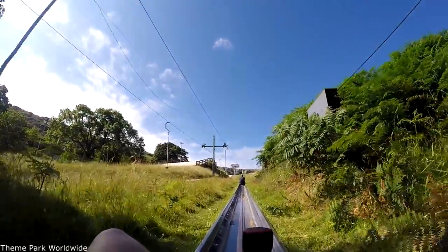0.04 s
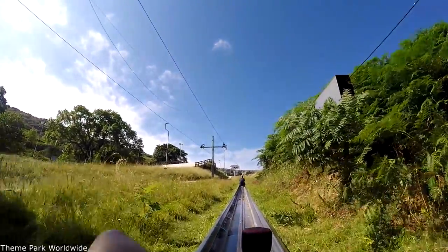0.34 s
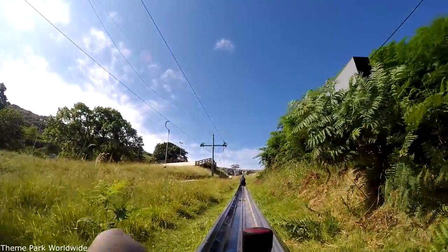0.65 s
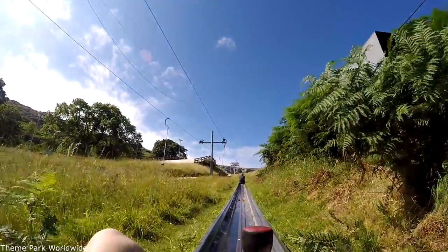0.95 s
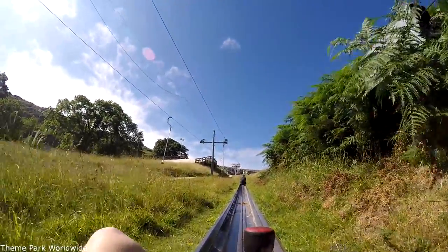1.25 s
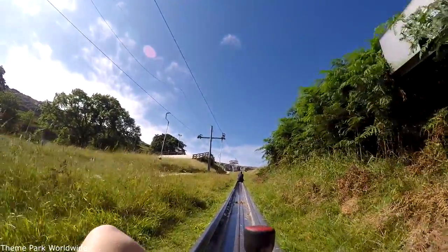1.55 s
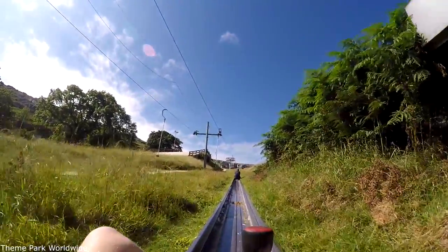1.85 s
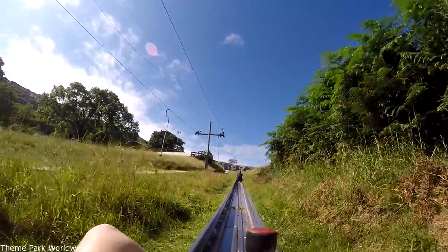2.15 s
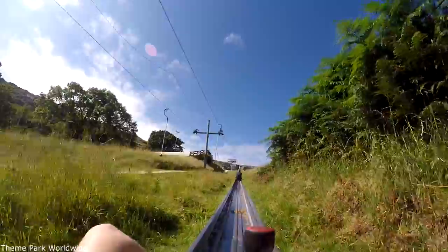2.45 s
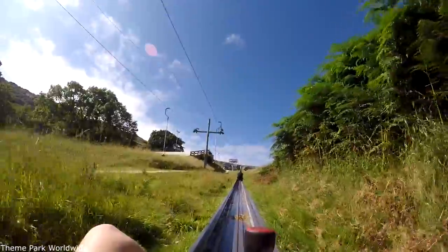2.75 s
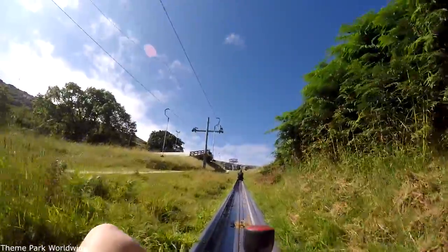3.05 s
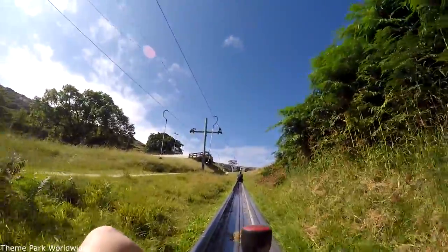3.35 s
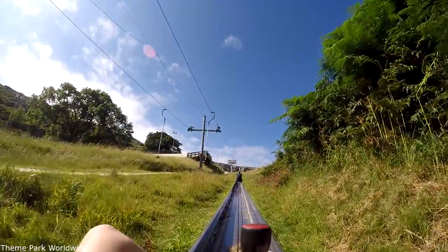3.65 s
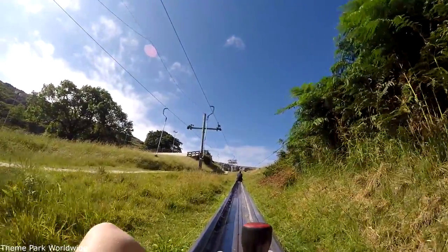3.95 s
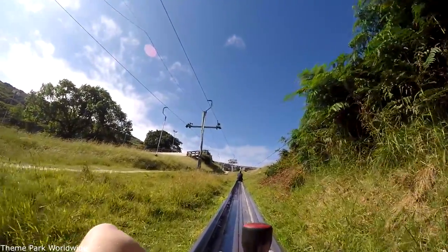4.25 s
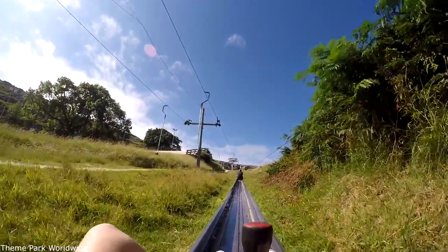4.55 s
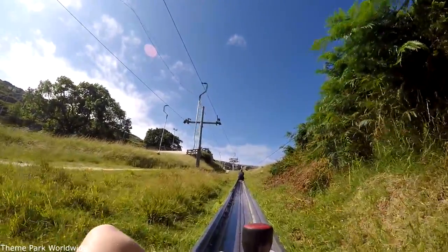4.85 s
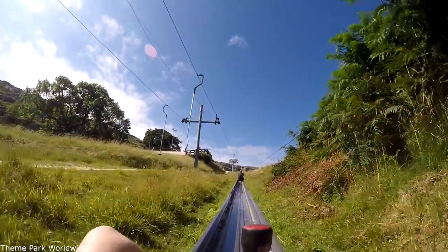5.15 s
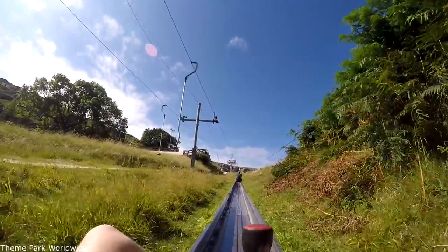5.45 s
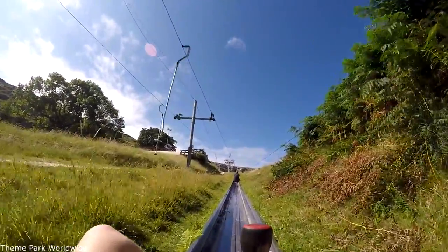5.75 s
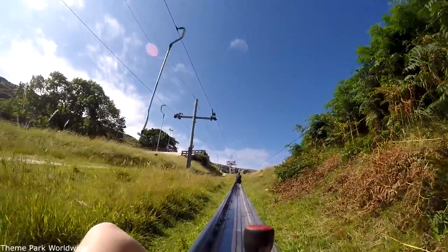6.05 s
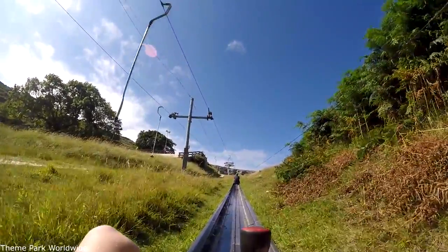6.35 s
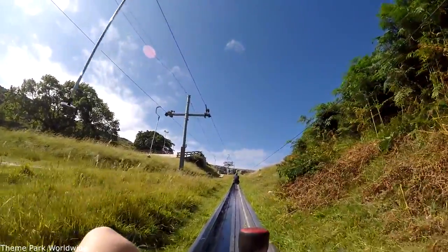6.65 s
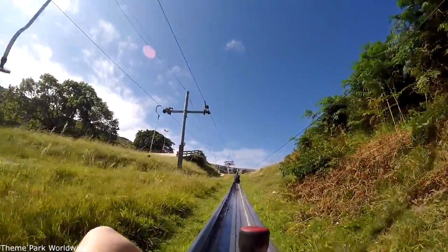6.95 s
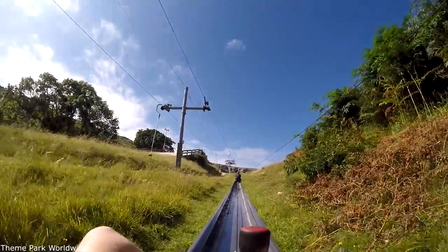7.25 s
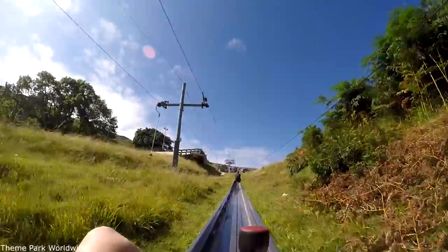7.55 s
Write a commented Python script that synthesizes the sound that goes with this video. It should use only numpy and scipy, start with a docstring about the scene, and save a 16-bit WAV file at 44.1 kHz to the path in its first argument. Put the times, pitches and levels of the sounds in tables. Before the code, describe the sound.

A toboggan sled is towed up a steel track on an open hillside, heard from the seat. Its wheels drum in a continuous low rumble, a little lighter at first, with a brief faint scrape on the rail. The rumble then grows fuller, with irregular hollow thumps from the shell, chattering loose fittings and occasional hard metal knocks. Light wind puffs against the microphone.

```python
"""Wheels drum on a steel track and thump the hollow shell of a summer toboggan being towed uphill.
The microphone rides at the seat, right above them. Close by, loose fittings chatter and now and then
knock hard. From below come the boom of the track and short scrapes and faint squeals where the sled
rubs the rail. Out on the open slope a little wind buffets the microphone, over a faint hiss."""
import sys
import numpy as np
from scipy import signal
from scipy.fft import rfft, irfft
from scipy.io import wavfile
from scipy.ndimage import uniform_filter1d

SR = 44100
rng = np.random.default_rng(int(sys.argv[2]) if len(sys.argv) > 2 else 0)


def store_wav(level_fs):
    """Save 16-bit WAV to argv[1]."""
    pcm = np.round(np.clip(np.atleast_2d(level_fs), -1, 1) * 32767)
    wavfile.write(sys.argv[1], SR, pcm.T.astype(np.int16))


N = 340011

# puffs of wind on the microphone: t/s at the peak, level/dB over the breeze
WIND_PUFFS = [(.02, 8.9), (1.96, 11), (2.53, 6.6), (3.87, 14.5), (4.49, 4.7), (5.78, 6)]
# squeals of the rail: t/s, length/s, first f/Hz, last f/Hz, level/dB
RAIL_SQUEALS = [(.257, 0.033, 2650, 2615, -51), (0.683, 0.03, 2170, 2400, -50),
                (5.49, .03, 4790, 4740, -53), (5.515, .06, 4600, 4500, -59)]
# light touches on the rail: t/s, length/s, f/Hz, level/dB
RAIL_BRUSHES = [(0.259, 0.009, 5750, -47), (1.302, 0.22, 4800, -59), (1.54, 0.4, 5060, -61.5),
                (5.397, 0.096, 4640, -54.5), (6.467, 0.1, 4900, -56.5)]
# course of the long scrape: t/s, level/dB
SCRAPE_CURVE = [(.165, -58.5), (.35, -49.5), (.39, -58), (.44, -47), (.53, -46.5), (.65, -54), (.695, -42),
                (.78, -53), (.84, -65)]
# grit cracking under the scrape: t/s, force/dB
GRIT_CRACKS = [(.172, -42.5), (.282, -44), (.437, -40), (.490, -38), (.524, -41)]
# clicks of small loose parts: t/s, force/dB
PART_CLICKS = [(1.673, -45), (1.849, -47), (2.252, -47.5), (2.558, -46), (4.359, -45), (4.591, -50),
               (5.109, -48), (5.411, -43), (5.727, -49), (6.416, -48)]
# drops of a wheel onto the hollow track: t/s, force/dB
WHEEL_DROPS = [(.007, -21.5), (0.339, -25), (.578, -32), (.866, -37), (0.962, -26.5), (.995, -22),
               (1.077, -25), (1.134, -26.5), (1.338, -20), (1.945, -20), (2.366, -28), (2.399, -27),
               (2.721, -27), (2.862, -28), (3.04, -29), (3.416, -30), (3.85, -29), (4.245, -29),
               (4.283, -28), (4.474, -31), (4.502, -23), (5.141, -28), (5.263, -30), (5.629, -23),
               (6.187, -23), (6.496, -30), (7.226, -28), (7.294, -28)]
# heavy bumps that set one part of the shell booming: t/s, f/Hz, level/dB
SHELL_THUMPS = [(.002, 372, -19.5), (1.216, 348, -16.5), (1.311, 365, -16.5), (1.411, 408, -17.5),
                (1.957, 232, -14.5), (2.400, 313, -23), (3.013, 360, -20.5), (3.175, 221, -19),
                (3.41, 349, -25), (3.622, 384, -16.5), (3.851, 300, -15), (4.076, 190, -30),
                (4.226, 364, -16), (4.277, 365, -19), (4.413, 365, -18.5), (4.478, 340, -14),
                (5.009, 205, -17), (5.136, 342, -37), (5.248, 366, -13.5), (5.587, 366, -18),
                (5.701, 339, -16), (5.778, 163, -18), (5.893, 532, -19.5), (5.975, 360, -19.5),
                (6.118, 371, -20.5), (6.345, 351, -19), (6.619, 357, -20), (6.798, 193, -18),
                (7.028, 220, -17)]
# hard knocks of metal on metal: t/s, clack force/dB, crunch force/dB, thud force/dB
METAL_KNOCKS = [(.0074, -40, -41, -13.5), (.408, -43, -50, -44), (1.3388, -34.5, -51, -22),
                (1.4028, -36, -52, -22), (1.945, -54, -44, -29), (2.395, -32.5, -40, -13),
                (2.4928, -35, -51, -21), (3.441, -39, -59, -37), (3.7228, -40, -62, -38),
                (3.7815, -39.5, -52, -27), (3.86, -38, -39, -18), (3.873, -41, -43, -24),
                (3.886, -35, -42, -21), (3.921, -40, -58, -25), (4.0342, -38, -54, -31),
                (4.078, -51, -58, -12.5), (4.47, -33, -38, -38), (4.479, -31, -39, -11),
                (4.9375, -42, -60, -29), (5.048, -36.5, -51, -33), (5.246, -36, -40, -24),
                (5.289, -54, -54, -28), (5.711, -63, -66, -15), (5.778, -41, -49, -24),
                (6.163, -35.5, -45, -15), (6.4751, -37.5, -49, -16.5), (7.192, -42.5, -54, -25),
                (7.2412, -38, -51, -39)]
# the biggest jolts of the wheels: t/s, force/dB
BIG_JOLTS = [(.109, -38), (0.192, -41.5), (0.325, -37.5), (0.437, -39.5), (.531, -37.5), (.664, -38.5),
             (.683, -34.5), (0.768, -36), (0.942, -35.5), (.995, -34), (1.013, -36), (1.074, -43),
             (1.421, -34), (1.738, -35.5), (1.944, -37.5), (2.114, -39), (2.307, -32.5), (2.685, -37.5),
             (3.019, -36.5), (3.534, -33), (3.642, -36), (3.839, -32), (4.246, -33.5), (4.286, -38),
             (4.59, -38), (4.654, -38.5), (4.793, -38), (5.003, -37), (5.141, -41), (5.533, -37),
             (5.928, -39.5), (6.639, -39), (7.003, -41), (7.318, -40), (7.408, -36.5), (7.583, -37)]
# how hard the wheels press on the track: t/s, load/dB over steady towing
WHEEL_LOAD = [(0, 4), (.07, -5), (.42, -6.5), (.47, -3), (.77, -4.5), (.86, -5.5), (.96, -4), (1.12, -4.5),
              (1.19, 0), (2.48, .5), (2.68, -4.5), (2.88, -6), (2.96, -0.5), (3.65, -0.5), (3.685, -5.5),
              (3.78, -3), (3.85, -0.5), (7.71, -0.5)]
# the sled bears down for a moment: t/s at the middle, length/s, added load/dB
LOAD_SURGES = [(3.62, 0.14, 1.5), (3.88, 0.11, 4), (4.25, 0.22, 1), (5.265, 0.1, 2.5), (5.8, 0.43, 1.5)]
# instants of smooth running: t/s at the middle, level change/dB
SMOOTH_LULLS = [(3.13, 0), (3.7, -3), (4.35, -2), (4.72, -4), (4.92, -4), (5.11, -2), (5.665, -4),
                (6.04, -2), (6.66, -0.5), (6.85, -2), (7.45, -1)]

# resonances: f/Hz, width/Hz, gain/dB
SHELL_RESONANCES = [(192, 25, 13), (232, 8.3, 1.5), (358.5, 59.4, 12), (441.4, 27, 6), (557.3, 61, 13.3),
                    (719, 58, 6), (794, 44, 10), (1232, 79, 4)]  # hollow shell around the seat
STEEL_RESONANCES = [(1301, 130, 9), (1570, 67, 8.5), (1874, 25, 10), (2088, 77, 7), (2414, 140, 7.5),
                    (2725, 82, 9), (2970, 44, 7), (3750, 160, 8), (4280, 36, 9.5), (4640, 51, 7.5),
                    (6400, 160, 11)]  # steel chassis
FITTING_VOICES = [(2300, 1100, 6), (5000, 2800, 6.5)]  # one for each loose fitting
CATCH_RESONANCES = [(2784, 280, 1), (3667, 260, -1.5)]  # a loose catch that ticks like a ratchet

# broad colours as they reach the microphone: f/Hz, relative level/dB
HISS_COLOUR = [(500, 6.5), (3000, -10.5), (6000, -6), (8000, -11), (11000, -16), (13300, -15), (15000, -15)]  # faint background
WIND_COLOUR = [(10, -17.5), (22, -3.5), (35, 3.5), (50, 0.5), (70, -13), (150, -25.5), (1000, -64),
               (5000, -99)]  # buffeting
BOOM_COLOUR = [(30, -30.5), (68, -23), (84, -1.5), (97, 1), (118, -7.5), (170, -20.5), (600, -73)]  # track under load
RASP_COLOUR = [(800, -25), (1900, -12), (2900, 6), (3250, -4), (3700, -8), (4100, -18), (4550, -9),
               (5050, 5), (5550, 6.5), (5950, -3), (6450, -1), (6750, -19), (7400, -13), (8800, -27),
               (10200, -21), (11000, -33), (12200, -23), (14500, -29)]  # scraped rail
GRIT_COLOUR = [(2000, -9), (5500, 12), (8000, -5), (11000, -10), (12500, -6), (15000, -8)]  # cracking grit
CLUNK_COLOUR = [(250, -15), (620, 10), (1000, -5), (1400, -16), (1800, -26.5), (6000, -51.5)]  # struck track
CLACK_COLOUR = [(300, -8), (1000, -21), (2000, 4.5), (3500, 1.5), (5400, 7.5), (7000, -3.5), (8500, -12.5),
                (11000, -20), (13500, -19.5), (15000, -24)]  # metal on metal
CRUNCH_COLOUR = [(1500, -2.5), (5500, 6), (8500, -1), (11000, -9), (13500, -10.5), (15000, -9)]  # gritty part of a knock
CHATTER_COLOUR = [(300, -7.5), (900, 5.5), (1400, 3.5), (1750, -18.5), (2800, 3.5), (3800, -5), (5000, -6),
                  (6300, -13), (7500, -21.5), (10500, -30), (15000, -38)]  # loose fittings
ROAR_COLOUR = [(300, -14), (700, 2.5), (1000, 0), (1400, -6.5), (1750, -17), (2800, -15), (4000, -24),
               (6500, -33), (10000, -50.5)]  # chassis
RUSH_COLOUR = [(60, -15.5), (140, -4.5), (175, -1), (225, 5.5), (265, -3), (470, -5), (640, -8.5),
               (900, -26.5), (1500, -40.5), (5000, -77)]  # wheels running lightly
SHELL_COLOUR = [(60, -26), (110, -10), (140, -2.5), (270, -0.5), (410, -2), (520, -4), (660, -10.5),
                (880, -22.5), (1200, -28), (1700, -33), (3000, -53), (15000, -83)]  # hollow shell


def from_db(db):
    """Decibels to gain."""
    return 10 ** (np.asarray(db) / 20)


def rms_one(x):
    """Scale to rms 1."""
    return x / np.sqrt(np.mean(x ** 2) + 1e-20)


def steady(x, window=3500):
    """Even out the level to rms 1 over a window of samples and keep the fast grain."""
    return x / np.sqrt(np.maximum(uniform_filter1d(x ** 2, window), 0) + 1e-12)


def in_time(curve):
    """A curve of (time, value) points, at every sample."""
    return np.interp(np.arange(N) / SR, *np.transpose(curve))


def swells(rows):
    """Sum of rounded rises and falls, each given as (middle, length, height)."""
    t = np.arange(N) / SR
    return sum(height * np.cos(np.pi * np.clip((t - middle) / length, -.5, .5))
               for middle, length, height in rows)


def drift(per_s):
    """Random wander with spread 1, changing about per_s times a second."""
    knots = rng.standard_normal(N // 20)
    return np.interp(np.arange(N) / SR * per_s, np.arange(len(knots)), knots) * np.sqrt(3 / 2)


def pulses(per_s):
    """One unit blow for each cycle of a changing rate."""
    return np.diff(np.floor(np.cumsum(per_s) / SR), prepend=0)


def taps(times, force_db):
    """Single-sample blows at the given times."""
    out = np.zeros(N)
    np.add.at(out, np.clip((times * SR).astype(int), 0, N - 1), from_db(force_db))
    return out


def buzz(blows, t60, rise_s=.0027):
    """Each blow breaks up into a burst of tiny contacts that swells and dies."""
    power = signal.lfilter([1], [1, -from_db(-120 / (t60 * SR))], blows ** 2 + 1e-18)
    lag = np.exp(-1 / (rise_s * SR))
    return np.sqrt(signal.lfilter([1 - lag], [1, -lag], power)) * rng.standard_normal(N)


def pole_pair(hz, width_hz):
    """Feedback coefficients of one damped vibration."""
    radius = np.exp(-np.pi * width_hz / SR)
    return [1, -2 * radius * np.cos(2 * np.pi * hz / SR), radius ** 2]


def resonance(x, hz, width_hz):
    """One resonance with gain 1 at its peak."""
    poles = pole_pair(hz, width_hz)
    return signal.lfilter(np.array([1, 0, -1]) * (1 - poles[2]) / 2, poles, x + 1e-18)


def body(force, colour, modes=(), size=2 ** 14):
    """Response of a body with a broad colour and resonances; white noise keeps its power."""
    hz = np.maximum(np.arange(size // 2 + 1) * SR / size, 1)
    colour_hz, colour_db = np.transpose(colour)
    db = np.interp(np.log(hz), np.log(colour_hz), colour_db)
    for centre, width, lift in modes:
        db += lift / (1 + (2 * (hz - centre) / width) ** 2)
    cepstrum = irfft(np.log(rms_one(from_db(db))), size)
    cepstrum[1:size // 2] *= 2  # minimum phase: it rings only after the blow
    cepstrum[size // 2 + 1:] = 0
    response = irfft(np.exp(rfft(cepstrum)), size)
    return signal.oaconvolve(force, response[:size // 2])[:N]


def noise(colour, modes=()):
    """Coloured noise at about rms 1."""
    return body(rng.standard_normal(N), colour, modes)


def hiss():
    """A faint, even hiss behind everything."""
    return from_db(-62.5) * noise(HISS_COLOUR)


def wind(rise_db_per_s=.69, puff_s=.21):
    """The breeze freshens slowly up the hill and buffets the microphone in short puffs."""
    breeze_db = -42.5 + rise_db_per_s * np.arange(N) / SR + 1.4 * drift(3.4)
    puff_db = swells([(s, puff_s, db) for s, db in WIND_PUFFS])
    return from_db(breeze_db + puff_db) * steady(noise(WIND_COLOUR), window=10000)


def track_boom(load_db):
    """The track booms beneath the sled, growing steeply with the load."""
    return from_db(-34 + 2.13 * load_db) * steady(noise(BOOM_COLOUR), window=7000)


def squeals():
    """Stick and slip on the rail half lock into a thin hoarse tone that catches, slides and fades."""
    out = np.zeros(N)
    waver_hz = 150 * drift(900)
    tremble = 1 + .5 * drift(900)
    for start, length, first_hz, last_hz, db in RAIL_SQUEALS:
        progress = np.clip((np.arange(N) / SR - start) / length, 0, 1)
        hz = first_hz + (last_hz - first_hz) * progress + waver_hz
        envelope = 2 * np.minimum(10 * progress, 1) * np.sqrt(1 - progress)
        out += from_db(db) * envelope * np.sin(2 * np.pi * np.cumsum(hz) / SR)
    return tremble * out


def brushes():
    """A light touch on the rail swells and fades in one narrow steel resonance."""
    out = np.zeros(N)
    for start, length, hz, db in RAIL_BRUSHES:
        progress = np.clip((np.arange(N) / SR - start) / length, 0, 1)
        ring = rms_one(resonance(rng.standard_normal(N), hz, width_hz=330))
        out += from_db(db) * np.sqrt(np.abs(np.sin(np.pi * progress))) * ring
    return out


def scrape(slips_per_s=790):
    """Dense little slips on the rail below the seat make a thin rasp, with grit cracking in it."""
    t = np.arange(N) / SR
    touching = (t > SCRAPE_CURVE[0][0]) & (t < SCRAPE_CURVE[-1][0])
    slips = (rng.random(N) < slips_per_s / SR) * rng.exponential(1, N)
    rasp = steady(body(buzz(slips, t60=.016), RASP_COLOUR))
    cracks = taps(*np.transpose(GRIT_CRACKS))
    grit = body(buzz(cracks, t60=.013), GRIT_COLOUR)
    return touching * from_db(in_time(SCRAPE_CURVE)) * rasp + grit


def clicks(load_db, fine_per_s=12):
    """Small metal parts click close by; finer clicks come at random, more of them under load."""
    struck = rng.random(N) < fine_per_s * from_db(2 * load_db) / SR
    fine = struck * from_db(-56 + rng.uniform(-3, 3, N))
    blows = taps(*np.transpose(PART_CLICKS)) + fine
    return from_db(6.5) * body(buzz(blows, t60=.014, rise_s=.0004), CLACK_COLOUR)


def clunks():
    """A wheel drops, and the short hard contact rings the hollow steel of the track."""
    blows = taps(*np.transpose(WHEEL_DROPS))
    return body(buzz(blows, t60=.046, rise_s=.00067), CLUNK_COLOUR, STEEL_RESONANCES)


def shell(force, spread_hz=190):
    """Bending waves spread out through the shell, so a blow swells into a short rounded ring."""
    for hz, _, _ in SHELL_RESONANCES:
        poles = pole_pair(hz, spread_hz)
        force = signal.lfilter(poles[::-1], poles, force + 1e-18)  # all-pass: delays this band
    return body(force, SHELL_COLOUR, SHELL_RESONANCES)


def thumps(swell_s=.008, heave_hz=98):
    """A heavy bump swells briefly into one resonance of the shell, over a deep heave of the track."""
    out = np.zeros(N)
    age = np.arange(SR // 5) / SR
    envelope = age / swell_s * np.exp(1 - age / swell_s)
    heave = from_db(-9) * np.sin(2 * np.pi * heave_hz * age)
    for s, hz, db in SHELL_THUMPS:
        start = int(s * SR)
        thump = from_db(db) * envelope * (np.sin(2 * np.pi * hz * age) + heave)
        out[start:start + len(age)] += thump[:N - start]
    return out


def knocks(grains_per_s=2500):
    """Metal strikes metal near the microphone: clack, crunch, chassis clatter and a thud of the shell."""
    s, clack_db, crunch_db, thud_db = np.transpose(METAL_KNOCKS)
    blows = taps(s, clack_db)
    clack = body(buzz(blows, t60=.038, rise_s=.0007), CLACK_COLOUR, STEEL_RESONANCES)
    grains = rms_one((rng.random(N) < grains_per_s / SR) * 1.0)
    crunch = body(buzz(taps(s, crunch_db), t60=.055, rise_s=.001) * grains, CRUNCH_COLOUR)
    clatter = body(buzz(blows, t60=.01), ROAR_COLOUR, STEEL_RESONANCES)
    thud = shell(taps(s, thud_db))
    return clack + crunch + from_db(-1.5) * clatter + from_db(23.5) * thud


def jolts(load_db, small_per_s=7):
    """Jolts shake fittings, chassis and shell; the small ones come at random, harder under load."""
    struck = pulses(small_per_s * np.exp(.7 * drift(12)))
    small = struck * from_db(-40.5 + load_db + 2.5 * rng.uniform(-1.1, 1, N))
    big = taps(*np.transpose(BIG_JOLTS))
    rattle = body(buzz(big + small, t60=.023, rise_s=.0048), CHATTER_COLOUR, STEEL_RESONANCES)
    clatter = body(buzz(big + small, t60=.033, rise_s=.002), ROAR_COLOUR, STEEL_RESONANCES)
    thud = shell(big + from_db(-6.5) * small)
    return from_db(.5) * rattle + from_db(4.5) * clatter + from_db(34) * thud


def fittings(bumps):
    """Every bump shakes one of the loose fittings and ticks the catch; fine grit lies in between."""
    shaken = rng.integers(0, len(FITTING_VOICES), N)
    ticks = [buzz(bumps * (shaken == k), t60=.014, rise_s=.0016) for k in range(len(FITTING_VOICES))]
    ticking = sum(body(tick, CHATTER_COLOUR, STEEL_RESONANCES + [voice])
                  for tick, voice in zip(ticks, FITTING_VOICES))
    catch = sum(from_db(db) * resonance(resonance(bumps, hz, width), hz, width)
                for hz, width, db in CATCH_RESONANCES)
    grit = noise(CHATTER_COLOUR, STEEL_RESONANCES)
    return steady(rms_one(ticking) + from_db(-3) * rms_one(catch) + from_db(-11) * grit)


def chassis_roar(bumps):
    """Bumps and fine roughness keep the steel under the seat roaring."""
    grain = rms_one(buzz(bumps, t60=.033)) + from_db(-10) * rng.standard_normal(N)
    return steady(body(grain, ROAR_COLOUR, STEEL_RESONANCES))


def flexing(ring, pitch_share=.015):
    """The shell flexes under its rider, so all its resonances wander a little together."""
    position = np.cumsum(1 + pitch_share * drift(9))
    return np.interp(position * (N - 1) / position[-1], np.arange(N), ring)


def rumble(bumps, level_db, ring_from_db=-28.25, ring_range_db=6.5):
    """Light running gives a loose dull rush; pressed hard on the track, the shell rings."""
    ring_share = np.clip((level_db - ring_from_db) / ring_range_db, .05, 1)
    push = rms_one(bumps * rng.choice([-1, 1], N)) + from_db(.5) * rng.standard_normal(N)
    drum = steady(flexing(shell(push)), window=2600)
    rush = steady(noise(RUSH_COLOUR), window=2600)
    return from_db(level_db) * (np.sqrt(ring_share) * drum + np.sqrt(1 - ring_share) * rush)


def wheel_bumps(bumps_per_s=86, judders_per_s=34):
    """Quick uneven bumps of the wheels; they come in clumps as the sled judders."""
    judder_cycles = np.cumsum(judders_per_s * np.exp(.2473 * drift(22))) / SR
    judder_db = 5 * np.sin(2 * np.pi * judder_cycles)
    struck = pulses(bumps_per_s * np.exp(.16 * drift(90)))
    return struck * from_db(judder_db + 2.5 * rng.uniform(-2.04, 1, N))


def rolling(load_db, turns_per_s=5, high_spot_s=.02, settle_below_db=-3.5):
    """Right below the microphone the wheels drive shell, fittings and chassis, louder under load."""
    bumps = wheel_bumps()
    chatter = fittings(bumps)
    roar = chassis_roar(bumps)
    # one wheel is out of round and presses hardest once in every turn
    throb = np.cos(2 * np.pi * turns_per_s * (np.arange(N) / SR - high_spot_s))
    uneven_db = 1.2 * drift(18)
    settle_db = 3.7 * np.maximum(settle_below_db - load_db, 0)  # fittings settle under light load
    shake_db = 1.8 * throb + uneven_db - settle_db
    lull_db = swells([(s, .049, db) for s, db in SMOOTH_LULLS])
    rumble_db = -22.75 + load_db + .57 * throb + .5 * uneven_db + .9 * drift(13) + lull_db
    chatter_db = -51.5 + .69 * load_db + shake_db
    roar_db = -43.5 + .97 * load_db + .7 * shake_db + lull_db
    return rumble(bumps, rumble_db) + from_db(chatter_db) * chatter + from_db(roar_db) * roar


def scene():
    """One microphone at the seat: the sled all around it, rail and track below, wind and hiss."""
    load_db = in_time(WHEEL_LOAD) + swells(LOAD_SURGES)
    sled = rolling(load_db) + jolts(load_db) + knocks() + clunks() + thumps() + clicks(load_db)
    rail = scrape() + brushes() + squeals()
    background = track_boom(load_db) + hiss() + wind()
    return (sled + rail + background)[None, :]


def record(dry, cutoff_hz=15300):
    """A steep low-pass takes the very top off the microphone signal."""
    return signal.sosfilt(signal.ellip(10, .1, 80, cutoff_hz, fs=SR, output="sos"), dry)


dry = scene()
out = record(dry)
store_wav(out)
```